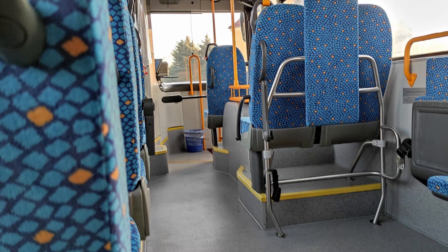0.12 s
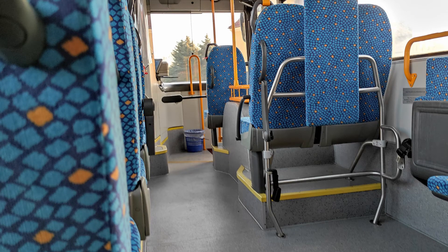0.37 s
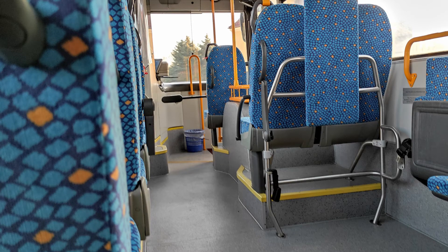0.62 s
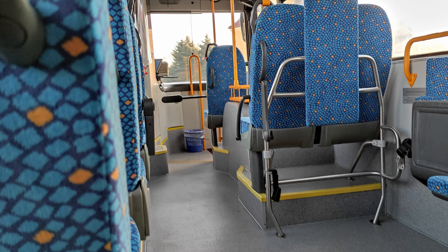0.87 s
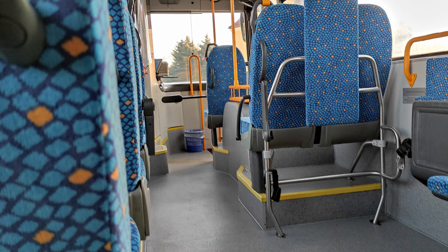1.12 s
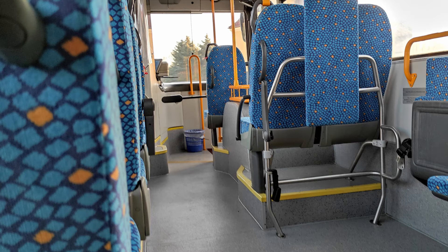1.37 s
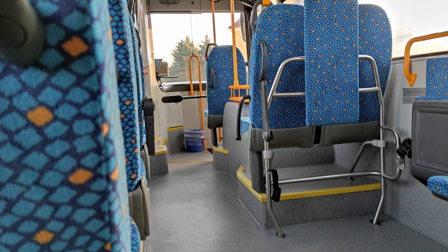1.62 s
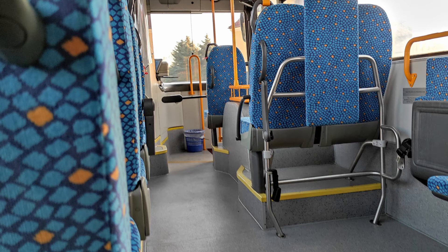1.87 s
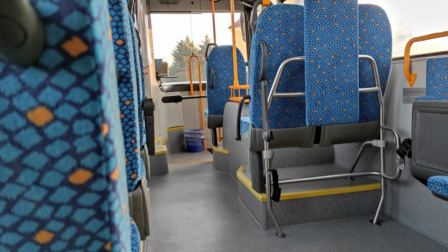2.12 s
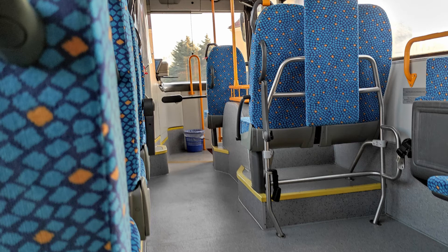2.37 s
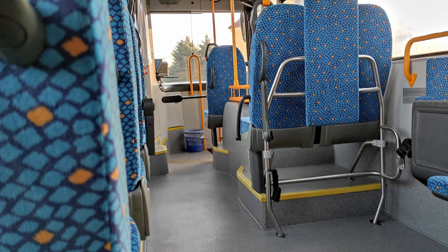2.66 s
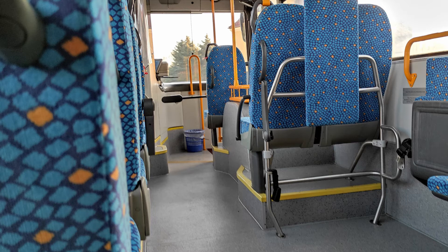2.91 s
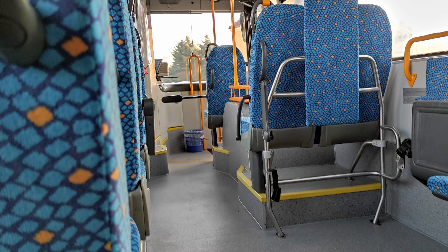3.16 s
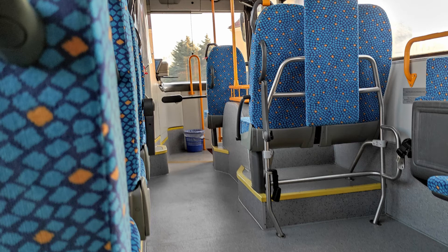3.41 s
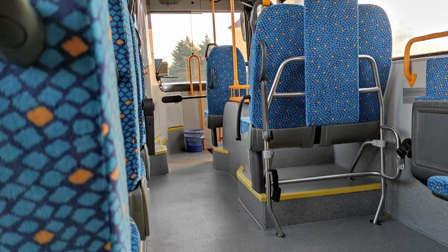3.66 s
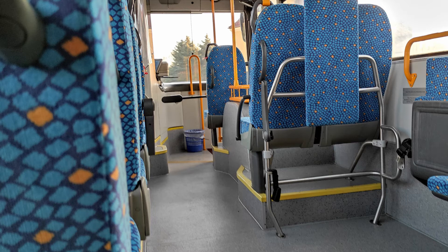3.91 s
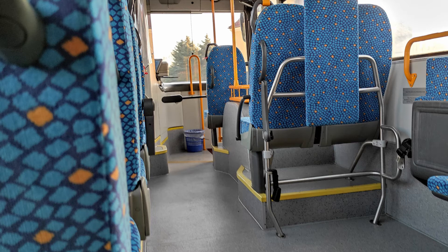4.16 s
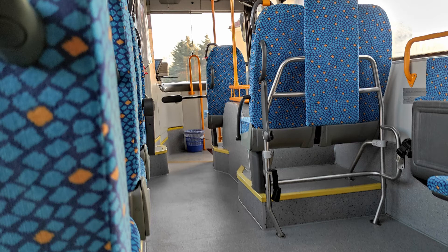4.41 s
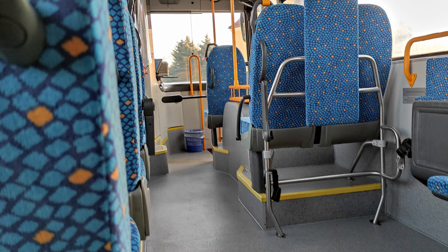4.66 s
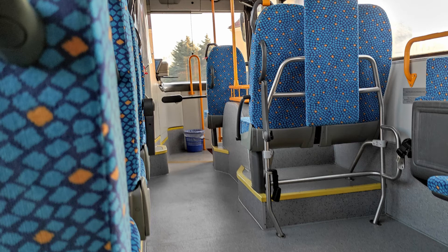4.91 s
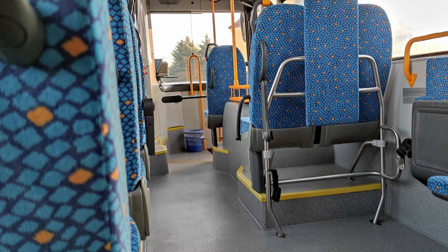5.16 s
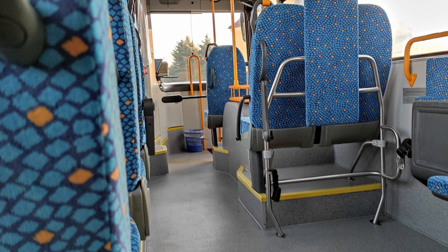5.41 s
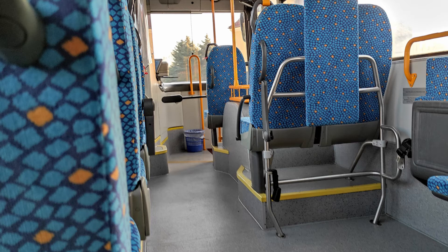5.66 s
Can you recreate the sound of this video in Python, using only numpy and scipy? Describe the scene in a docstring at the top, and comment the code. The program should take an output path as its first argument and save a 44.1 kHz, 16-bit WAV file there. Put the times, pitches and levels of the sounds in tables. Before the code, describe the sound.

Heard from a seat inside a diesel city bus, a low drone of engine, road and fan runs throughout, coloured by the boxy cabin, with thin, wavering hums. A bump at about 0.5 s makes a very deep boom; lesser booms and soft floor thuds follow, with a firm knock near 1.6 s and more thumping at 2 s. Loose fittings rattle in short dry bursts, densest around 1.6-2.5 s. At 1.1 s an air valve gives one bright puff, dulling and gone within half a second. The engine slows over the first two seconds, and from about 2.5 s its idle throb becomes heavy and dominant, with shifting geared whines. From 2.8 s a faint, breathy brake squeal climbs until 3.3 s, then slowly sags, fluttering with the engine. A thud at 3 s and sparse rattles, busier around 4.3-5.4 s, continue until the 5.8 s end. Deep bass leans left.

```python
"""The firing throb of a diesel engine, heard inside a bus that slows to idle: harmonics of the firing rate.
Bumps boom in one low shell mode, thuds ring floor modes, and dense small knocks rattle the fittings.
Cabin resonances shape a drone of filtered noise with thin hums; an air valve puffs once as a noise jet,
and late on a thin brake squeal sets in as narrow-band noise.
Two close microphone ports hear the deep bass louder and later on the left."""
import sys
import numpy as np
from scipy import signal
from scipy.fft import rfft, irfft, next_fast_len
from scipy.io import wavfile
from scipy.ndimage import uniform_filter1d

SR = 44100
rng = np.random.default_rng(int(sys.argv[2]) if len(sys.argv) > 2 else 0)


def pcm_store(signal):
    """Save signal as 16-bit PCM."""
    levels = np.round(np.clip(np.atleast_2d(signal), -1, 1) * 32767)
    wavfile.write(sys.argv[1], SR, levels.astype(np.int16).T)


def voltage_ratio(level):
    """Linear amplitude factor for a level in decibels (scalar or array-like)."""
    return 10 ** (np.asarray(level, float) / 20)


N = 254898
T = np.arange(N) / SR


def evened(x):
    """Power normalization: scales a signal to rms 1."""
    return x / np.sqrt(np.mean(x ** 2) + 1e-20)


def read_spectrum(points, hz):
    """Interpolation on a logarithmic frequency axis: the columns of a table at the given frequencies."""
    f, *values = np.transpose(points)
    return [np.interp(np.log(hz + 1), np.log(f + 1), v) for v in values]


def read_course(rows, t=T):
    """Linear interpolation in time: the columns of a table at the given seconds."""
    s, *columns = np.transpose(rows)
    return [np.interp(t, s, c) for c in columns]


def wander(hz):
    """Low-pass filtered noise: a slow random course with corner near hz, rms 1."""
    r = np.exp(-2 * np.pi * hz / SR)
    course = signal.lfilter([1], [1, -2 * r, r * r], rng.standard_normal(N + SR))
    return evened(course[SR:])  # the first second lets the filter settle


def resonate(x, hz, width):
    """Resonance by heterodyne: shifts hz (fixed or moving) to zero, smooths, and shifts back."""
    turn = np.exp(2j * np.pi * np.cumsum(hz * np.ones(x.shape[-1])) / SR)
    r = np.exp(-np.pi * width / SR)
    return 2 * (turn * signal.lfilter([1 - r], [1, -r], x / turn)).real


def resonate_twice(x, hz, width, second_width):
    """Cascaded resonance: a second pass steepens the skirts."""
    return resonate(resonate(x, hz, width), hz, second_width)


# The sound field between the two ports. Each row: frequency in Hz, likeness from 0 to 1,
# left-right level in dB, phase by which the left lags in radians.
FIELD = [(12, 0.8, 42, 0.91), (21.9, .99, 10, 1.1), (34.8, 0.9, 7.5, 1.1), (60, 0.93, 8, 1.1),
         (100, 1, -1, 0.62), (169, 0.81, 1.5, 0.24), (304, 0.74, -0.5, 0.41), (400, 0.85, -1, 0.0031),
         (506, 0.42, 1.5, 1.48), (610, 0.63, -3, 0.63), (1000, 0.06, 0.5, 0.92), (2250, 0, -0.9, 0.4),
         (8000, 0.01, 0.5, 0.17), (15000, 0, -2, 0.32)]


def noise(magnitude, size):
    """Partial coherence: two channels of random short-time spectra, as alike as the field says; mid rms 1."""
    frames, hz = 4 * N // size + 5, np.fft.rfftfreq(size, 1 / SR)
    a, b, c, d = rng.standard_normal((frames, len(hz), 4)).T
    same = np.clip(read_spectrum(FIELD, hz)[0], 0, 1)[:, None]
    left = a + 1j * b
    right = same * left + np.sqrt(1 - same ** 2) * (c + 1j * d)
    frame_s = np.arange(frames) * size / 4 / SR
    z = np.array([left, right]) * magnitude(hz[:, None], frame_s)
    out = signal.istft(z, nperseg=size, noverlap=3 * size // 4)[1][:, :N]
    return out / np.sqrt(np.mean(out.mean(0) ** 2))


# Hums of fan and accessories. Each row: frequency in Hz, level in dB before its wavering.
HUM_TONES = [(1229, -63.5), (2212, -82.5)]


def hums():
    """Random frequency and amplitude modulation: thin tones waver a little in pitch and level."""
    out = np.zeros(N)
    for hz, db in HUM_TONES:
        level = voltage_ratio(db + 5.4 * wander(hz=2.3))
        turns = np.cumsum(hz * (1 + .004 * wander(hz=1.206))) / SR
        out += np.sqrt(2) * level * np.sin(2 * np.pi * turns)
    return out


# Spectrum of the drone. Each row: frequency in Hz, relative density in dB per Hz.
DRONE_SPECTRUM = [(7, -26), (13, -10.5), (30, -23), (46, -12), (107, -16), (163, -16.5), (202, -21),
                  (264, -20.5), (430, -25.5), (530, -32.5), (1380, -33.5), (2160, -42), (2600, -43),
                  (4850, -49.5), (5400, -50.5), (7700, -52), (9000, -64), (11000, -65), (15700, -66)]
# Cabin resonances lifting the drone. Each row: frequency in Hz, width in Hz, lift in dB.
CABIN_MODES = [(22, 5, 8.5), (72, 10, 1), (131, 34.5, 5), (168, 17, 1.5), (259.6, 18, 3), (282, 13.5, 4),
               (371.3, 4.6, 4), (405, 57, 4.5), (729, 167, 5), (1040, 105, 2.5), (1367, 65, 5),
               (1614, 49, 2.5), (2590, 180, 2), (7720, 35, 7.5)]
# Road noise, surging over bumps and fading as the bus slows. Each row: time in seconds, change in dB,
# of which the bass takes the most.
ROAD_COURSE = [(0, 0.5), (.08, 2), (.35, -0.5), (.6, 1.5), (.9, -3), (1.1, -4), (1.9, -1.5), (2.1, 1),
               (2.5, -3), (4.2, -1.5), (5.78, -3.5)]
DRONE_DB = -33  # mid rms, ahead of the clatter


def drone(turns):
    """Resonant filtering: block, fan and road noise excite the cabin; its treble clatters with each firing."""
    def magnitude(hz, t):
        road_db = read_course(ROAD_COURSE, t)[0]
        road_share = 0.15 + 1.02 / (1 + (hz / 230) ** 2)
        peaks_db = sum(db / (1 + (2 * (hz - f) / width) ** 2) for f, width, db in CABIN_MODES)
        # narrow random patches of the noise swell and fade by a decibel or two
        patches = rng.standard_normal((len(t), len(hz)))
        patches = uniform_filter1d(patches, size=13, axis=0)
        patches = uniform_filter1d(patches, size=4, axis=1)
        patches_db = 1.75 * evened(patches).T / (1 + hz / 9000)
        return voltage_ratio(read_spectrum(DRONE_SPECTRUM, hz)[0] + peaks_db + patches_db + road_share * road_db)
    steady = voltage_ratio(DRONE_DB) * noise(magnitude, size=8192)
    treble = signal.sosfilt(signal.butter(2, 3000, "high", fs=SR, output="sos"), steady)
    clatter = 0.09 * np.cos(2 * np.pi * turns) + 0.044 * wander(hz=40.) + 0.05 * wander(hz=1.6)
    return steady + clatter * treble


# Spectrum of the air jet. Each row: frequency in Hz, relative density in dB per Hz.
JET_SPECTRUM = [(1800, -27), (3000, -5), (3490, -11), (3900, 1), (4700, -10), (6200, -1), (7700, -6),
                (9000, -10), (11400, -17), (12900, -14), (14200, -12), (15700, -23)]
PUFF_S, PUFF_DB, PUFF_RISE_S, PUFF_T60_S = 1.138, -49.5, 0.044, 0.5  # dB ahead of the envelope
LEAK_DB, LEAK_T60_S, SPUTTER_DB = -7, 0.76, 1.5  # the valve leaks on as it closes; the jet sputters
DULLS_DB_PER_OCTAVE_S = 43  # the jet starts bright and dulls as the pressure drops


def valve():
    """Turbulent jet noise: compressed air opens at once, swells to a short core and decays exponentially."""
    def magnitude(hz, t):
        since_core = np.clip(t - PUFF_S - PUFF_RISE_S, -PUFF_RISE_S, PUFF_RISE_S)
        tilt_db = DULLS_DB_PER_OCTAVE_S * np.log2((hz + 1) / 6000) * since_core
        return voltage_ratio(read_spectrum(JET_SPECTRUM, hz)[0] - tilt_db)
    t = T - PUFF_S
    swell = np.clip(t / .004, 0, 1) * (0.5 + 0.45 * np.clip(t / PUFF_RISE_S, 0, 1) ** 2)
    after = np.maximum(t - PUFF_RISE_S, 0)
    core = voltage_ratio(-60 * after / PUFF_T60_S)
    leak = voltage_ratio(LEAK_DB - 60 * np.maximum(t, 0) / LEAK_T60_S) * (after > 0)
    level = voltage_ratio(PUFF_DB + SPUTTER_DB * wander(hz=70.))
    return level * swell * np.maximum(core, leak) * noise(magnitude, size=512)


SQUEAL_S, SQUEAL_CLIMB_S, SQUEAL_DB = 2.8, 0.49, -64.5  # dB ahead of flicker, pulse and swell
SQUEAL_LOW_HZ, SQUEAL_TOP_HZ, SQUEAL_SAG_HZ_PER_S = 4550, 5000, 120  # ahead of the pitch wavering
SQUEAL_FLICKER_DB, SQUEAL_PULSE_DB = 3.2, 2.5  # random breaks, and a pulse with each firing


def squeal(turns):
    """Narrow-band noise: a breathy brake squeal swells as its moving resonance climbs, then sags in pitch."""
    climb = np.clip((T - SQUEAL_S) / SQUEAL_CLIMB_S, 0, 1)
    sag_hz = SQUEAL_SAG_HZ_PER_S * np.maximum(T - SQUEAL_S - SQUEAL_CLIMB_S, 0)
    hz = SQUEAL_LOW_HZ + (SQUEAL_TOP_HZ - SQUEAL_LOW_HZ) * climb - sag_hz
    hz = hz * (1 + .014 * wander(hz=16.))
    tone = resonate_twice(rng.standard_normal((2, N)), hz, 130, 130)
    flicker_db = SQUEAL_FLICKER_DB * wander(hz=30)
    pulse_db = SQUEAL_PULSE_DB * np.cos(2 * np.pi * turns)
    return evened(tone) * voltage_ratio(SQUEAL_DB + flicker_db + pulse_db) * np.sqrt(climb)


# Ringing of the loose fittings. Each row: frequency in Hz, width of the first pass in Hz, relative level in dB.
FITTING_MODES = [(1450, 340, 14), (1780, 400, 9), (2270, 190, -9), (2650, 140, 5.5), (3135, 260, 8),
                 (4020, 330, 5.5), (4620, 320, 2.5), (5500, 270, -2.5), (6040, 420, -12), (6740, 530, 2.5),
                 (7500, 230, -11), (9500, 1100, -18), (10300, 840, -14), (12000, 1400, -9),
                 (14200, 1800, -11)]
# Bursts of rattling. Each row: start in seconds, level in dB ahead of the envelope, length in seconds,
# frequency in Hz of the parts favoured, left-right level in dB ahead of the ports.
RATTLE_BURSTS = [(0.04, -54, 0.036, 2500, 5), (0.54, -51, 0.052, 2480, -2), (0.597, -55, 0.0055, 3000, -1),
                 (0.857, -60, .006, 4000, -1), (1.614, -53.5, 0.008, 6500, 1), (1.639, -47, .008, 4800, 4),
                 (1.685, -55, .012, 7000, 0), (1.98, -55, 0.032, 7000, 2), (2.017, -52.5, 0.061, 3960, -1),
                 (2.03, -61, .04, 9500, 0), (2.113, -49, 0.064, 1450, -4), (2.36, -53, 0.12, 1400, 0),
                 (2.078, -50, .015, 5500, 0), (2.178, -56, 0.014, 8500, -1), (2.228, -63, 0.018, 11800, 0),
                 (2.225, -52, 0.022, 4500, 0), (2.28, -53, 0.008, 5940, 3), (2.52, -47.5, 0.011, 5870, 2),
                 (2.544, -48, 0.0069, 6040, 4.5), (3.182, -53, 0.14, 2650, -1),
                 (3.438, -51, 0.012, 5500, -1), (3.85, -52, .01, 4900, 0), (4.266, -57.5, .07, 6960, 3),
                 (4.468, -55.5, 0.062, 7500, 5), (4.524, -54.5, 0.09, 6400, 0), (4.65, -50, .012, 4800, 0),
                 (4.707, -56, 0.029, 6950, 1), (4.736, -51, 0.012, 6800, -1), (4.781, -47, 0.012, 5200, -1),
                 (5.06, -57, .008, 4830, 0), (5.12, -49, 0.016, 3040, -10), (5.25, -66, .006, 9000, 0),
                 (5.38, -51.5, 0.11, 2650, 0), (5.613, -54, .015, 4500, 0)]
CRACK_WIDTH, CRACK_DB = .45, -5  # bare, broad click of each knock: width as a share of pitch, dB over the ringing


def rattles():
    """Impact excitation: dense small knocks ring the fittings, each burst favouring parts near one pitch."""
    strength = rng.standard_normal((2, N)) * voltage_ratio(2.0 * rng.exponential(1, N))
    knocks = strength * (rng.random(N) < 2200 / SR)  # 2200 knocks per second on average
    rings = np.array([voltage_ratio(db) * evened(resonate_twice(knocks, hz, width, 2 * width))
                      for hz, width, db in FITTING_MODES])
    octaves = np.log2(np.transpose(FITTING_MODES)[0])
    chance = rng.standard_normal((len(RATTLE_BURSTS), len(FITTING_MODES)))
    out = np.zeros((2, N))
    for (s, db, length, hz, pan_db), shaken in zip(RATTLE_BURSTS, chance):
        span = slice(round(s * SR), round((s + length + 0.036) * SR))
        t = T[span] - s
        attack = np.clip(t / (0.11 * length), 0, 1)
        tail = voltage_ratio(-60 * np.maximum(t - length, 0) / 0.033)  # the cabin holds a short tail
        favour = voltage_ratio(-4.0 * (octaves - np.log2(hz)) ** 2 + 4.3 * shaken)
        ringing = evened(np.tensordot(favour, rings[:, :, span], axes=1))
        crack = evened(resonate_twice(knocks[:, span], hz, CRACK_WIDTH * hz, CRACK_WIDTH * hz))
        burst = evened(ringing + voltage_ratio(CRACK_DB) * crack)
        out[:, span] += voltage_ratio(db + np.array([[.5], [-.5]]) * pan_db) * attack * tail * burst
    return out


# Floor and panel modes. Each row: frequency in Hz, relative level in dB, full decay time T60 in seconds.
FLOOR_MODES = [(41.5, -7, 0.43), (54.6, 3, 0.52), (66, -5, 0.33), (75, 3.5, 0.37), (90.5, -8, 0.54),
               (113.4, -14, 0.18), (123, 4.5, 0.24), (155, 2, 0.46)]
# Knocks from the suspension. Each row: start in seconds, strength in dB ahead of the mode levels,
# frequency in Hz around which modes are struck hardest, share of the full ring time.
SUSPENSION_KNOCKS = [(0.044, -28, 155, 0.86), (0.086, -30, 72, 1.), (0.249, -28.5, 155, 0.95),
                     (0.575, -26, 75.4, .8), (0.64, -29, 103, 0.49), (0.709, -28.5, 60, 0.78),
                     (0.835, -27.5, 52, 0.63), (0.961, -28, 66, 0.45), (1.575, -18.5, 114.4, 0.38),
                     (2.025, -22, 69.4, 0.59), (2.089, -26, 91, 0.53), (2.301, -32, 72, 0.93),
                     (3.032, -24, 100, 0.44), (4.683, -29.5, 82, 1.), (5.122, -29, 86, 1)]
THUD_RISE_S = 0.01


def thuds():
    """Modal synthesis: each knock rings the floor modes as decaying sines with a soft start."""
    t, out = T[:SR], np.zeros(N + SR)
    hz, mode_db, t60 = np.transpose(FLOOR_MODES)[:, :, None]
    phases = rng.random((len(SUSPENSION_KNOCKS), len(FLOOR_MODES), 1))
    for (s, db, struck_hz, share), phase in zip(SUSPENSION_KNOCKS, phases):
        weight_db = mode_db - 20.0 * np.log2(hz / struck_hz) ** 2
        decay = voltage_ratio(weight_db - 60 * t / (share * t60))
        ring = (decay * np.sin(2 * np.pi * (hz * t + phase))).sum(0)
        out[round(s * SR):][:SR] += voltage_ratio(db) * ring * (1 - np.exp(-t / THUD_RISE_S))
    return out[:N]


# Bumps that set the body shell booming. Each row: start in seconds, level in dB,
# settled frequency in Hz, hold in seconds.
SHELL_BUMPS = [(0.201, -30, 22, 0.13), (0.506, -15.5, 22.7, 0.185), (0.766, -25.5, 23.8, 0.14),
               (1.328, -29.5, 26, 0.12), (1.489, -20, 23.5, 0.041), (1.623, -24.5, 20, 0.018),
               (1.832, -30.5, 26, 0.035), (1.995, -24, 21.6, 0.13), (2.297, -32, 21.4, 0.032),
               (2.631, -35, 18, 0.056), (3.503, -27, 21, .06)]
# a struck shell starts sharp by a share of its pitch and settles
BOOM_RISE_S, BOOM_T60_S, BOOM_SHARP, BOOM_SETTLE_S = 0.048, 0.3, .25, .06
# between bumps the shell keeps shivering, less as the bus slows
SHIVER_HZ, SHIVER_DB, SHIVER_FADE_DB_PER_S = 22.8, -35.5, 1


def boom():
    """Single-mode response: a bump swells, holds and damps one low shell mode, its pitch settling."""
    t, out = T[:SR], np.zeros(N + SR)
    for s, db, hz, hold in SHELL_BUMPS:
        swell = np.sin(np.pi / 2 * np.clip(t / BOOM_RISE_S, 0, 1)) ** 2
        fall_db = -60 * np.maximum(t - BOOM_RISE_S - hold, 0) / BOOM_T60_S
        turns = hz * (t + BOOM_SHARP * BOOM_SETTLE_S * (1 - np.exp(-t / BOOM_SETTLE_S)))
        out[round(s * SR):][:SR] += np.sqrt(2) * swell * voltage_ratio(db + fall_db) * np.sin(2 * np.pi * turns)
    shiver = evened(resonate_twice(rng.standard_normal(N), SHIVER_HZ, 17, 17))
    return out[:N] + voltage_ratio(SHIVER_DB - SHIVER_FADE_DB_PER_S * T) * shiver


# Firing rate. Each row: time in seconds, firings per second.
FIRING_RATE = [(0, 36.2), (.55, 37.4), (1.3, 31.9), (1.9, 30.1), (2.4, 29.75), (3.2, 29.05), (3.7, 29.15),
               (4.4, 29.85), (5.78, 30)]
# The throb grows as the engine takes up the load at idle. Each row: time in seconds, fundamental in dB.
THROB_LEVEL = [(0, -46), (.7, -52), (1.1, -39), (1.45, -40), (1.7, -38.5), (2.1, -35.5), (2.6, -28.5),
               (3.9, -26), (5.78, -27.5)]
# Tones of parts geared to the engine. Each entry: multiple of the firing rate.
GEAR_RATIOS = [4.55, 5.53, 7.93, 9.75, 11.88]
# They come and go with the load. Each row: time in seconds, then the level in dB of each tone in turn.
GEAR_LEVELS = [(0, -47.5, -59, -56, -61, -57), (.6, -46, -53, -58, -54, -63),
               (1.0, -40, -52, -54, -57, -63), (1.3, -46, -58, -71, -43.5, -60),
               (1.7, -40, -53, -58, -51.5, -51), (2.0, -47, -58, -58, -52, -50),
               (2.4, -44.5, -53, -64, -68, -50), (2.8, -47.5, -44, -47, -49, -52.5),
               (3.6, -65, -46, -47, -60, -66), (4.1, -56, -42, -54, -47.5, -50),
               (4.6, -39, -53, -45, -59, -49.5), (5.2, -46.5, -47, -53.5, -58, -48.5),
               (5.78, -45.5, -50, -51, -62, -44)]
SECOND_DB, SECOND_DB_PER_HZ, IDLE_HZ = -42.5, 1.0, 30.9  # the second harmonic rises with speed above idle
THIRD_DB = -47.5


def engine():
    """Harmonic series of a periodic source: wavering throb and geared tones; also the position in firings."""
    hz, first_db = read_course(FIRING_RATE)[0], read_course(THROB_LEVEL)[0]
    second_db = SECOND_DB + SECOND_DB_PER_HZ * (hz - IDLE_HZ)
    turns = np.cumsum(hz * (1 + .003 * wander(hz=3.)) / SR)
    first = voltage_ratio(first_db + 0.32 * wander(hz=6.4)) * np.sin(2 * np.pi * turns)
    second = voltage_ratio(second_db + 2.0 * wander(hz=2.2)) * np.sin(4 * np.pi * turns + 1.)
    third = voltage_ratio(THIRD_DB + 2.2 * wander(hz=1.3)) * np.sin(6 * np.pi * turns)
    geared = sum(voltage_ratio(db + 1.2 * wander(hz=1.8)) * np.sin(2 * np.pi * ratio * turns)
                 for ratio, db in zip(GEAR_RATIOS, read_course(GEAR_LEVELS)))
    return np.sqrt(2) * (first + second + third + geared), turns


def scene():
    """Superposition: the sources add in the cabin, squeal and clatter keeping time with the engine."""
    throb, turns = engine()
    background = hums() + drone(turns) + valve() + squeal(turns)
    return background + rattles() + thuds() + boom() + throb


def band_limit(x):
    """A steep low-pass at the top of the band."""
    return signal.sosfilt(signal.butter(12, 15800, fs=SR, output="sos"), x)


def record(dry):
    """Linear filtering: level and phase offsets between the ports, mid gain kept, no response at zero Hz."""
    wide = np.pad(dry, ((0, 0), (SR, SR)), "reflect")
    size = next_fast_len(N + 2 * SR)
    hz = np.fft.rfftfreq(size, 1 / SR)
    _, balance_db, lag = read_spectrum(FIELD, hz)
    left = voltage_ratio(balance_db / 2) * np.exp(-.5j * lag)
    ports = np.array([left, 1 / left])
    ports /= abs(ports.mean(0))
    ports *= hz ** 2 / (hz ** 2 + 25)  # high-pass, half amplitude at 5 Hz
    heard = irfft(rfft(wide, size) * ports, size)[:, SR:SR + N]
    heard *= np.clip(np.minimum(T, T[::-1]) / .004, 0, 1)  # 4 ms fades at both ends
    return band_limit(heard)


dry = scene()
out = record(dry)
pcm_store(out)
```